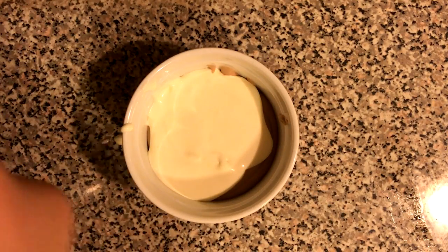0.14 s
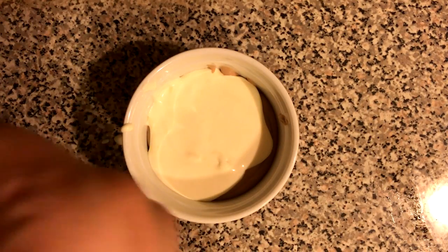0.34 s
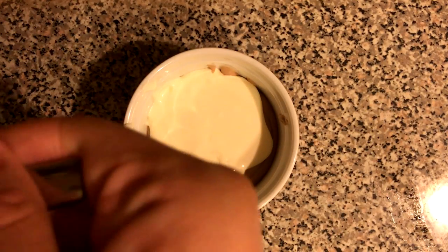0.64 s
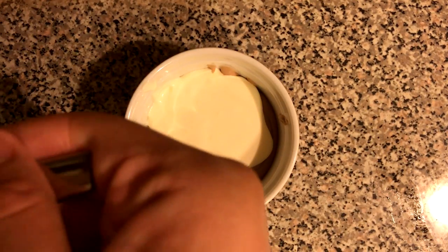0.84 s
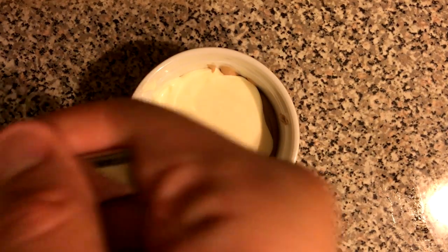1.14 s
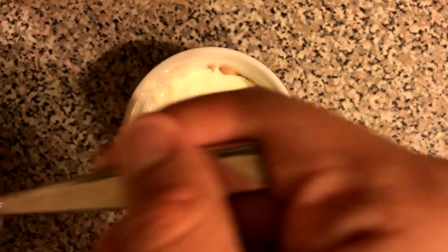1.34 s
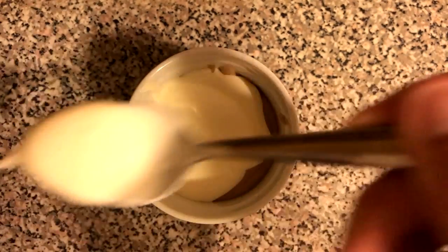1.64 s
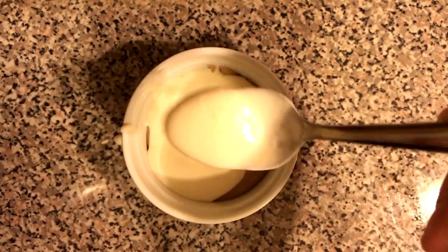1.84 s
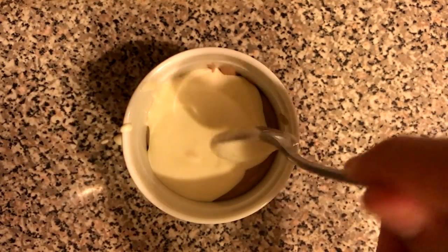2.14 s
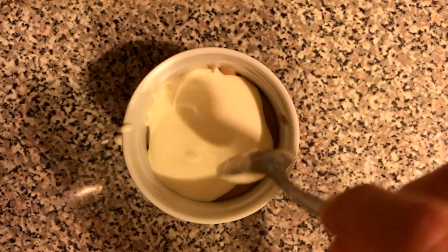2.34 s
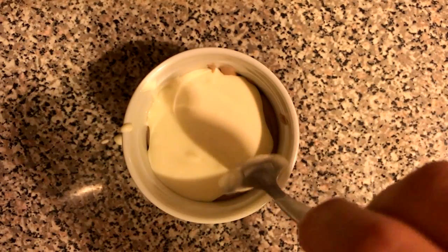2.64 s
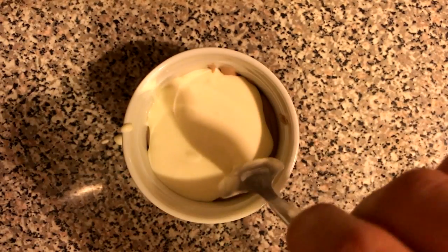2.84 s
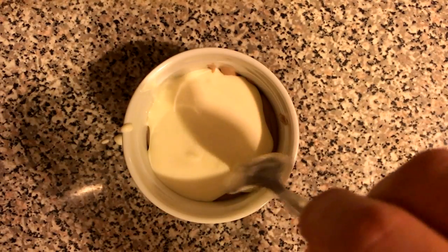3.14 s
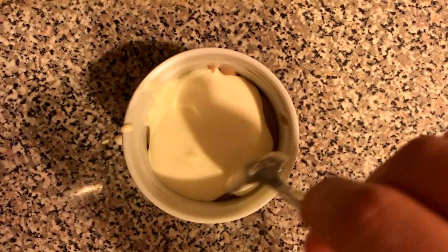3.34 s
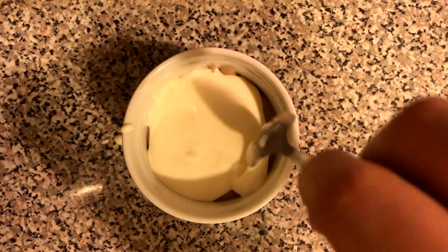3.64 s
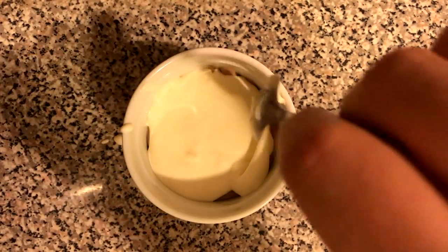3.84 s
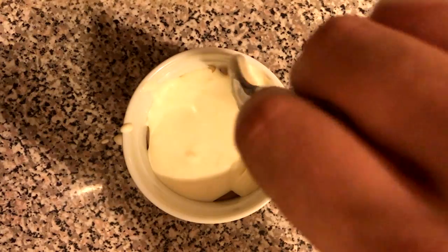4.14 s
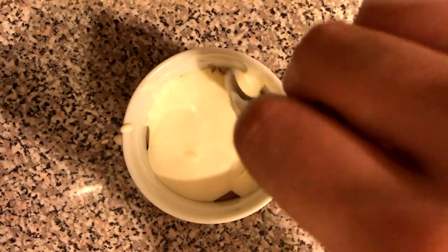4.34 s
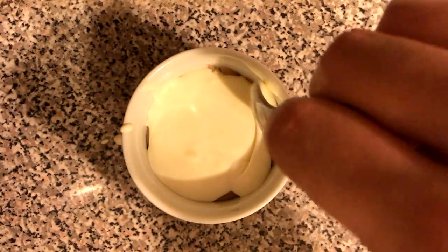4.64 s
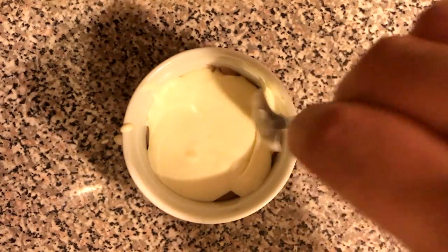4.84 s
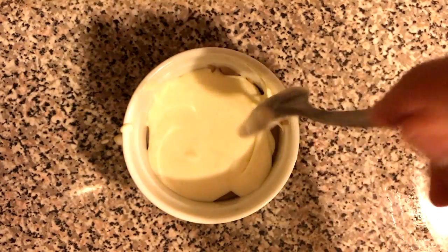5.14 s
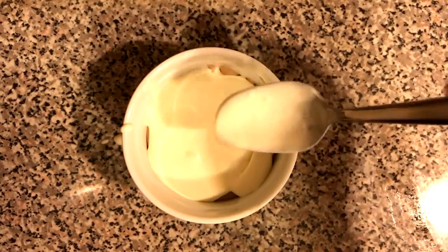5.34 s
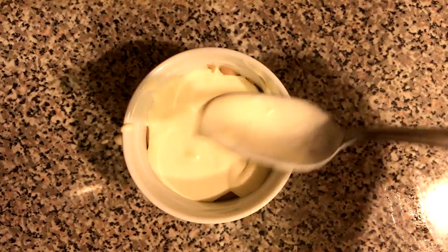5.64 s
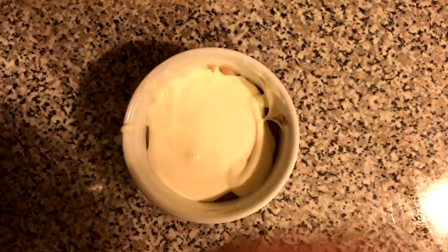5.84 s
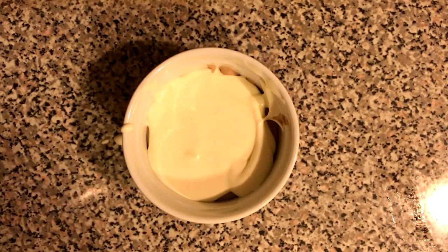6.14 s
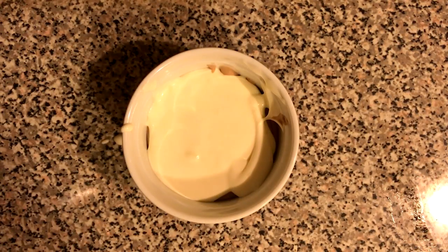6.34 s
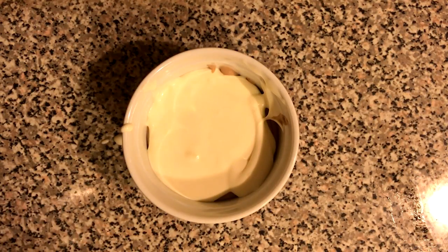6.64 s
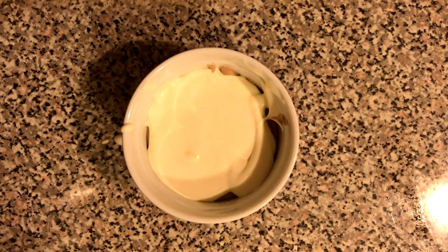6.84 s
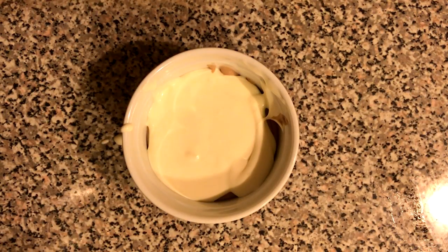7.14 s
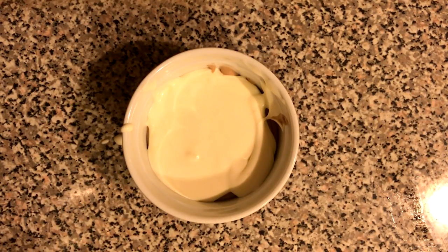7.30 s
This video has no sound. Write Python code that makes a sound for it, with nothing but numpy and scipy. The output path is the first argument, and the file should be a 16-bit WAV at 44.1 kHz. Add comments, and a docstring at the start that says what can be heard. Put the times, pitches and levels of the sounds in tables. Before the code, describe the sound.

A metal spoon knocks a mixing bowl, taps a small ceramic dish, then clacks on stone and clatters in a pan.

```python
"""A faint tone slides down over a steady appliance rumble; then a spoon ladling batter knocks a mixing bowl.
It scrapes off, taps a small ceramic dish, lands on the stone counter and clatters in a pan. Each impact
excites damped modes and a crack of contact noise, and the small hard kitchen reverberates.
Soft bumps travel through the stand of a phone close above, hand and cloth rustle near it,
and a treble hiss steps up for a while after the loudest blows."""
import sys
import numpy as np
from scipy import signal
from scipy.fft import rfft, irfft, next_fast_len
from scipy.io import wavfile
from scipy.ndimage import uniform_filter1d

SR = 44100
rng = np.random.default_rng(int(sys.argv[2]) if len(sys.argv) > 2 else 0)


def file_out(sig):
    """Save sig as 16-bit WAV at sys.argv[1]."""
    # one column per channel
    cols = np.atleast_2d(sig).T
    # limit, then scale
    lim = np.clip(cols, -1, 1)
    pcm = np.round(lim * 32767).astype(np.int16)
    wavfile.write(sys.argv[1], SR, pcm)


N = 329382

# Modes of the ceramic dish. Each row: frequency in Hz, relative level in dB, base t60 in seconds.
DISH_MODES = [(4807, -7, .15), (4868, -1, .25), (8721, -28, .27), (900, -22, .04), (1660, -18, .05),
              (1960, -11, .24), (3800, -10, .025), (4300, -14, .04), (5350, -20, .29), (5582, -22, .26),
              (13460, -23, .22), (15380, -33, .13)]


def bowl():
    """Impact and friction: knocks ring the bowl; the dragging spoon's bright contacts hardly do."""
    # Each row: frequency in Hz, relative level in dB, base t60 in seconds.
    modes = [(203, -20.5, 0.1997), (301.1, -15.5, .33), (1000, -26, .07), (1600, -18, 0.11),
             (3290, -17, 0.29), (3460, -23.5, 0.26), (4080, -18, .45), (4145, -8, 0.17), (4320, 2.5, .1),
             (4340, -22, .55), (4255, -17, .4), (4903, -13.5, .1), (5066, -7.5, .08), (5035, -27, .6),
             (5135, -6.5, 0.13), (5460, -16.5, 0.22), (5690, -15, .36), (5960, -19, .15), (8000, -39, .3),
             (8800, -41, .3), (11500, -40, .36), (12680, -42, .38), (14080, -41, .34), (15500, -48.5, .22)]
    # Contact noise spectrum. Each row: frequency in Hz, relative density in dB.
    crack = [(88, -68.5), (150, -17), (900, -13), (1620, -7.5), (2310, -15.5), (3230, -9.5), (3770, -10.5),
             (4420, -9), (5820, -6), (7510, -32.5), (13800, -42.5), (16500, -44.5)]
    # Each row: start in seconds, crack level in dB, decay in milliseconds.
    scrapes = [(1.459, -25, 7.5), (1.480, -33.5, 27), (1.538, -40, 14), (1.565, -34, 4.3), (1.575, -35, 8)]
    ring_db, ring_length, tilt_db = -4, .3, 9  # for the scrapes
    drags = [(start, db + ring_db, ring_length, db, ms, tilt_db) for start, db, ms in scrapes]
    return struck(contacts("bowl") + drags, modes, crack, rough=.49, spread=.017)


def dish_rim():
    """Lightly damped ceramic: a tap on the rim rings a close pair of high modes."""
    # Contact noise spectrum. Each row: frequency in Hz, relative density in dB.
    crack = [(120, -54), (250, -12), (900, -19), (1670, -13.5), (2750, -13), (4970, 0), (5650, -14.5),
             (6930, -20), (7740, -42), (8650, -27.5), (10200, -52), (13200, -28), (16500, -43)]
    return struck(contacts("dish"), DISH_MODES, crack, rough=.37, spread=.0044)


def dish_wall():
    """Modes belong to the body: the dish's wall sounds the same ones, more briefly, with another crack."""
    # Contact noise spectrum. Each row: frequency in Hz, relative density in dB.
    crack = [(120, -38), (200, -8), (628, -22), (1550, -9.5), (1800, -11), (2090, 2.5), (2860, -7.5),
             (4880, -3.5), (6800, -18.5), (7880, -39), (11000, -38), (13500, -24), (16500, -43)]
    return struck(contacts("wall"), DISH_MODES, crack, rough=.55, spread=.0153)


def counter():
    """Strong damping: the spoon lands on stone with a clack whose modes die quickly."""
    # Each row: frequency in Hz, relative level in dB, base t60 in seconds.
    modes = [(201, -9, 0.21), (335, -0.5, 0.08), (501, -30, 0.059), (956, -8, 0.022), (2310, -28, 0.059),
             (3560, -18, 0.15), (3930, -10, 0.035), (4500, -21.5, .05), (5600, -10.5, 0.05)]
    # Contact noise spectrum. Each row: frequency in Hz, relative density in dB.
    crack = [(59, -34), (100, 14), (1070, 0), (1410, -24), (2260, -10), (2860, -15), (4290, -3), (5670, -9),
             (7650, -39), (10000, -44), (12500, -33), (16500, -42)]
    return struck(contacts("counter"), modes, crack, rough=.5, spread=.079)


def pan():
    """Superposition: the rings of quick successive impacts overlap into a clatter."""
    # Each row: frequency in Hz, relative level in dB, base t60 in seconds.
    modes = [(604, -0.5, 0.068), (1076, -8.5, 0.029), (1592, -19.5, 0.12), (4060, -2, 0.035),
             (4330, -12, 0.09), (5474, 0, 0.035), (5560, -13, 0.16), (5700, -10, 0.2), (11460, -51, .1),
             (13500, -31, .04)]
    # Contact noise spectrum. Each row: frequency in Hz, relative density in dB.
    crack = [(88, -49), (150, -9), (1030, -7), (1750, -16), (2760, -28), (4080, -1), (4870, -26),
             (5590, -1.5), (8290, -36.5), (13800, -19), (16500, -41)]
    return struck(contacts("pan"), modes, crack, rough=.51, spread=.028)


def contacts(place):
    """Inelastic collision: a blow may chatter on in rebounds, each weaker than the rebound before."""
    # Each row: place, start in seconds, ring level in dB, crack level in dB,
    # crack decay in milliseconds, tilt in dB per octave, number of rebounds.
    blows = [("bowl", 1.409, -49, -45.5, 10, -1, 0), ("bowl", 1.432, -3.5, 0.5, 4.1, 1.04, 3),
             ("dish", 3.984, -22, -10, 3.2, 0.6, 0), ("dish", 4.089, -20.5, -14, 6.5, 0.1, 0),
             ("wall", 4.604, -33, -12.5, 2.6, 0.73, 1), ("wall", 4.724, -46, -20.5, 2.4, -0.6, 0),
             ("wall", 4.732, -47, -27, 2.6, -0.55, 0), ("counter", 6.215, -18.5, -7.5, 1.2, 6.8, 1),
             ("counter", 6.221, -30, -9, 2.7, 1.8, 1), ("pan", 6.598, -6, 0.4, 4.5, 0.2, 2),
             ("pan", 6.622, -20.5, -19.5, 4.7, -1.1, 0), ("pan", 6.637, -20.5, -13, 2.7, 0.16, 0),
             ("pan", 6.650, -23, -32, 14, .1, 0)]
    # For each place: factor on the modes' t60 at first contact.
    ring_length = dict(bowl=.66, dish=0.62, wall=.42, counter=.85, pan=0.79)
    # For each place: gap in milliseconds, ring and crack of the first rebound in dB relative
    # to the blow, factor on t60, crack decay in milliseconds.
    rebound = dict(bowl=(5, 0, -12.5, 0.28, 1.6), wall=(4, -4, -8, .5, 2.5), counter=(3.5, 5, -5, 0.89, 3),
               pan=(4, -11.5, -11, 1.02, 5))
    step_db, gap_scatter = -1.4, .08
    rows = []
    for name, start, ring_db, crack_db, crack_ms, tilt_db, count in blows:
        if name == place:
            rows.append((start, ring_db, ring_length[place], crack_db, crack_ms, tilt_db))
            for k, jitter in enumerate(rng.standard_normal(4)[:count]):
                gap_ms, ring_offset, crack_offset, length, decay_ms = rebound[place]
                delay = (k + 1 + gap_scatter * jitter) * gap_ms / 1000
                rows.append((start + delay, ring_db + ring_offset + k * step_db, length,
                             crack_db + crack_offset + k * step_db, decay_ms, 0))
    return rows


def struck(blows, modes, crack_colour, rough, spread):
    """Modal synthesis: each impact excites exponentially decaying sines and a burst of contact noise."""
    shimmer_db, shimmer_ms = -27.5, 25  # faint upper modes blur into a noisy tail
    out, t = np.zeros(N + SR), np.arange(16384) / SR
    ms = 1000 * t
    shimmer = amp(shimmer_db) * np.exp(-ms / shimmer_ms)
    hz, db, t60 = np.transpose(modes)[:, :, None]
    for start, ring_db, length, crack_db, crack_ms, tilt_db in blows:
        # Two neighbours beat with each mode: rough scales their amplitude, spread their detuning.
        neighbours = sum(weight * np.sin(2 * np.pi * hz * (1 + spread * detune) * t)
                         for weight, detune in rng.standard_normal((2, 2, len(hz), 1)))
        waves = np.sin(2 * np.pi * hz * t) + rough * neighbours
        gain = amp(ring_db + db + tilt_db * np.log2(hz / 4000))
        ring = (gain * waves * 1000 ** (-t / (t60 * length))).sum(axis=0)
        ring *= np.minimum(t / .0004, 1) * (1 - (t / t[-1]) ** 2)
        attack = np.minimum(ms / (.18 * crack_ms), 1)
        burst = rng.standard_normal(len(t)) * attack * (np.exp(-ms / crack_ms) + shimmer)
        tilted = [(f, level + tilt_db * np.log2(f / 4000)) for f, level in crack_colour]
        out[int(start * SR):][:len(t)] += ring + amp(crack_db) * colour(burst, tilted)
    return out[:N]


def reverberation(x):
    """Diffuse field: after a short gap, broad bands of reflections each decay at their own rate."""
    # Each row: centre in Hz, t60 in seconds, relative level in dB.
    bands = [(199.4, .30, -18.5), (595.7, 0.17, -20.5), (1500, .28, -24), (3720, 0.23, -24),
             (8000, 0.27, -34.5), (13040, 0.076, -32.5)]
    late_db, late_factor = -12.5, 2.5  # a weaker, slower decay from the adjoining space
    t = np.arange(SR // 2) / SR
    tail = 0
    for hz, t60, db in bands:
        fade = 1000 ** (-t / t60) + amp(late_db) * 1000 ** (-t / (late_factor * t60))
        tail += amp(db) * band(rng.standard_normal(len(t)), hz, .9 * hz) * fade
    window = np.clip((t - .002) / .004, 0, 1) * (1 - 2 * t)
    return signal.fftconvolve(x, .0998 * tail * window)[:N]


def stand_bumps():
    """Structure-borne sound: damped wobbles pass through the stand, each lasting a few cycles."""
    # Each row: crest time in seconds, peak level in dB, frequency in Hz, fall in seconds.
    bumps = [(1.753, -21.5, 87.6, 0.015), (1.804, -25, 87.7, 0.02), (2.166, -28, 93.5, 0.0078),
             (6.227, -21, 109, 0.023), (6.615, -25.5, 91, 0.018)]
    rise_s = .011
    out, t = np.zeros(N), np.arange(-SR // 20, SR // 4) / SR
    for crest, db, hz, fall in bumps:
        envelope = np.exp(-np.where(t < 0, (t / rise_s) ** 2, t / fall))
        out[int((crest + t[0]) * SR):][:len(t)] += amp(db) * envelope * np.cos(2 * np.pi * hz * t)
    return out


def sliding_tone():
    """Linear chirp: a faint sine sags steadily in pitch while its level wavers."""
    start_s, length_s, attack_s, release_s = .2, .38, .085, .04
    start_hz, sag_hz_per_s, level_db, waver_db = 474, 155, -50.5, 3.5
    t = np.arange(N) / SR - start_s
    envelope = np.clip(np.minimum(t / attack_s, (length_s - t) / release_s), 0, 1)
    hz = start_hz - sag_hz_per_s * np.clip(t, 0, length_s)
    peak = np.sqrt(2) * amp(level_db + waver_db * walk(14.6))
    return peak * envelope * np.sin(2 * np.pi * np.cumsum(hz) / SR)


def rustle():
    """Friction noise: hand and cloth rub in short grainy swells with a body and a fine top."""
    # Each row: crest time in seconds, body level in dB, top level in dB, rise and fall in seconds.
    swells = [(6.195, -61, -72, .09, .004), (6.49, -56.5, -76, 0.034, 0.044), (6.576, -55, -67, .008, .008),
              (7.118, -51, -72, .008, .014), (7.228, -57, -81, .03, .012), (7.29, -52, -61, .018, .045),
              (7.376, -54, -66, 0.018, 0.013), (7.400, -45, -75, .0012, 0.0099),
              (7.42, -55, -78, .005, .015)]
    # Each row of both spectra: frequency in Hz, relative density in dB.
    body_spectrum = [(1000, -10), (2500, -7), (4000, 1.5), (5500, -9.5), (7500, -26), (12000, -47.5)]
    top_spectrum = [(6000, -39.5), (10000, -25), (13000, -2.5), (16000, -11.5)]
    t, out = np.arange(N) / SR, 0
    grains = amp(3 * walk(330)) * rng.standard_normal(N)
    body, top = unit(colour(grains, body_spectrum)), unit(colour(grains, top_spectrum))
    for crest, body_db, top_db, rise, fall in swells:
        envelope = np.exp(-np.abs(t - crest) / np.where(t < crest, rise, fall))
        out += envelope * (amp(body_db) * body + amp(top_db) * top)
    return out


def background():
    """Steady filtered noise: rumble, low hums and two faint bands of high hiss, plus a thin whine."""
    # Each row: frequency in Hz, relative density in dB.
    rumble_spectrum = [(15, -36), (25, -55), (43, -0.5), (74, -6), (105, -0.5), (135, -3), (296, -7),
                       (378, -13.5), (617, -11.5), (746, -17.5), (3230, -28.5), (4130, -25.5),
                       (6550, -46.5), (14400, -60.5), (16500, -51)]
    # Each row: centre in Hz, bandwidth in Hz, level in dB.
    noise_bands = [(102, 14, -59), (170.8, 8.3, -56.5), (613, 60, -70.5), (4100, 340, -78),
                   (13530, 2400, -83)]
    rumble_db, whine_hz, whine_db, step_db = -47.5, 993.4, -90.5, -1.5
    bands = sum(amp(db) * unit(band(rng.standard_normal(N), hz, width)) for hz, width, db in noise_bands)
    cycles = whine_hz * np.arange(N) / SR
    whine = sum(amp(whine_db + k * step_db) * np.sin(2 * np.pi * ((6 + k) * cycles + rng.random()))
                for k in range(10))  # harmonics 6 to 15
    rumble = amp(rumble_db + .4 * walk(2.08)) * colour(rng.standard_normal(N), rumble_spectrum)
    return rumble + bands + whine


def hiss():
    """Gated noise: a broad treble band switches on and off at set times."""
    spans_s, level_db = [(1.432, 1.855), (6.215, 7.01)], -65
    t = np.arange(N) / SR
    gate = sum((t > start) & (t < end) for start, end in spans_s)
    return gate * amp(level_db) * band(rng.standard_normal(N), hz=9930, width=9000)


def colour(x, points):
    """Minimum-phase filter through (Hz, dB) points at unit mean power gain, by the folded cepstrum."""
    hz, db = np.transpose(points)
    size = next_fast_len(len(x))
    gain = amp(np.interp(np.log(np.fft.rfftfreq(size, 1 / SR) + 1), np.log(hz), db))
    cepstrum = irfft(np.log(unit(gain)), size)
    cepstrum[1:size // 2] *= 2
    cepstrum[size // 2 + 1:] = 0
    return irfft(rfft(x, size) * np.exp(rfft(cepstrum)), size)[:len(x)]


def band(x, hz, width):
    """Two-pole resonance with its bandwidth in Hz."""
    return signal.lfilter(*signal.iirpeak(hz, hz / width, fs=SR), x)


def walk(rate):
    """Random modulation: levels held for 1 / rate seconds and smoothed twice."""
    hold = int(SR / rate)
    steps = np.repeat(rng.standard_normal(N // hold + 1), hold)
    return .83 * uniform_filter1d(uniform_filter1d(steps, hold), hold)[:N]


def amp(db):
    """Amplitude ratio of a level in dB."""
    return 10 ** (np.asarray(db) / 20)


def unit(x):
    """Normalisation to unit RMS."""
    return x / np.sqrt(np.mean(x ** 2))


def scene():
    """Superposition: direct impacts, their reverberation and the background add in one channel."""
    # For each place: how strongly it feeds the room, in dB.
    send_db = dict(bowl=0, dish=1.6, wall=-1, counter=-3, pan=0)
    hits = dict(bowl=bowl(), dish=dish_rim(), wall=dish_wall(), counter=counter(), pan=pan())
    echo = reverberation(sum(amp(send_db[place]) * x for place, x in hits.items()))
    return (sum(hits.values()) + echo + stand_bumps() + sliding_tone() + rustle()
            + background() + hiss())[None]


def record(dry):
    """Compression and band limiting: the phone cuts deep bass, turns down and rounds peaks, cuts the top."""
    threshold_db, reduction_share, release_db_per_s = -6.5, .4, 53
    bass_hz, top_hz = 40, 16200
    lean = signal.sosfilt(signal.butter(3, bass_hz, "high", fs=SR, output="sos"), dry)
    over_db = np.maximum(20 * np.log10(np.abs(lean) + 1e-9) - threshold_db, 0)
    fall = release_db_per_s * np.arange(N) / SR  # the held excess drains slowly after each peak
    held_db = np.maximum(np.maximum.accumulate(over_db + fall, axis=1) - fall, 0)
    gain = amp(-reduction_share * uniform_filter1d(held_db, size=64))
    rounded = .8 * np.tanh(gain * lean / .8)
    return signal.sosfilt(signal.ellip(12, .2, 100, top_hz, fs=SR, output="sos"), rounded)


dry = scene()
out = record(dry)
file_out(out)
```